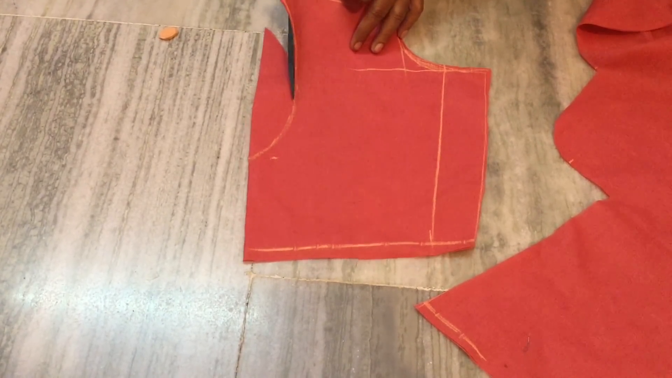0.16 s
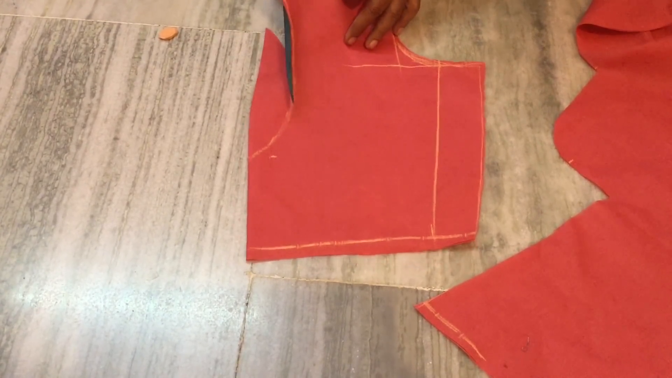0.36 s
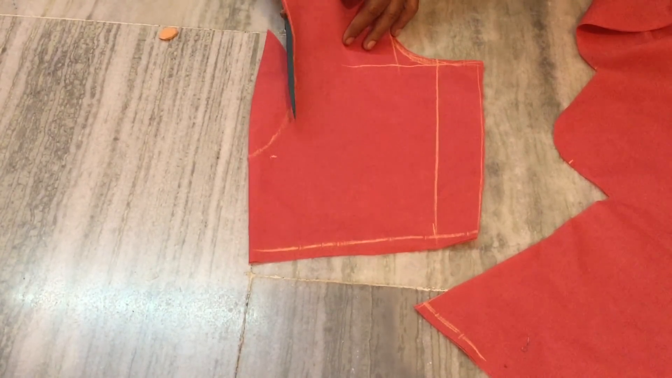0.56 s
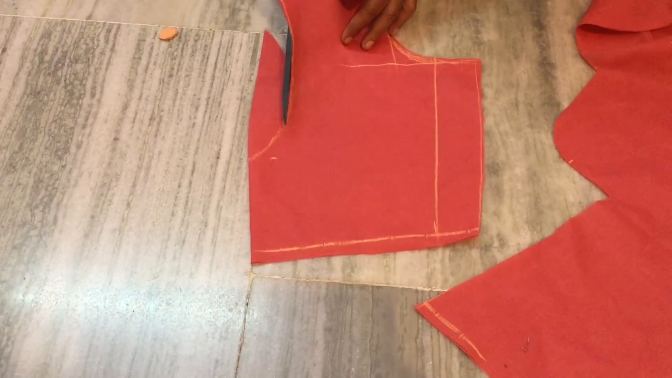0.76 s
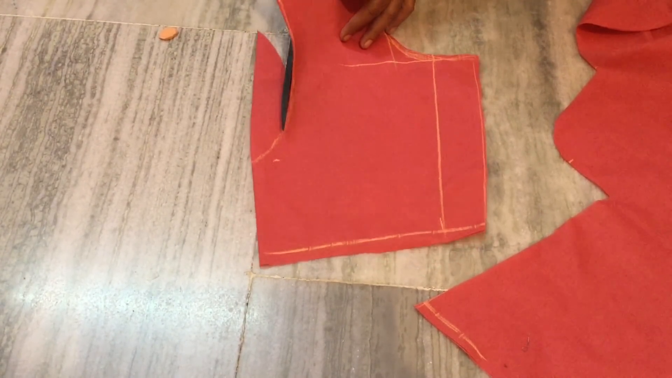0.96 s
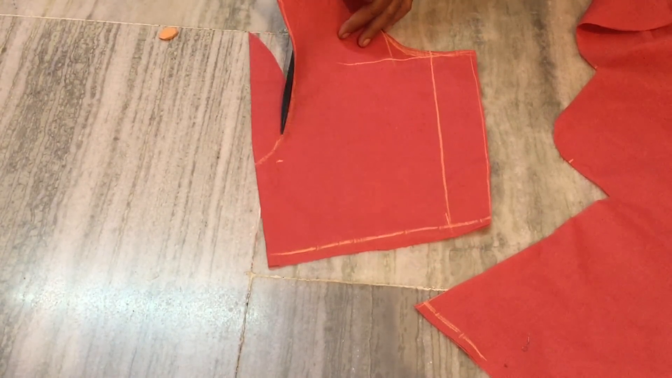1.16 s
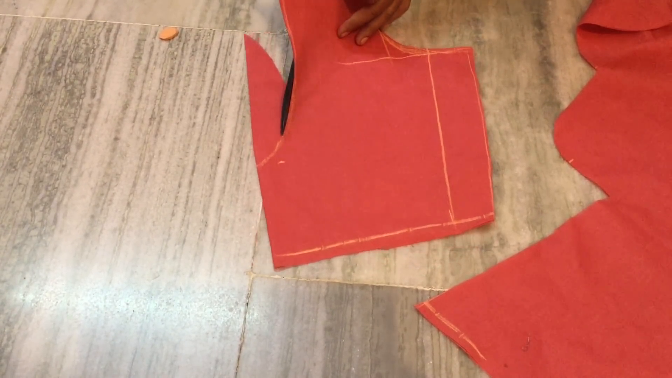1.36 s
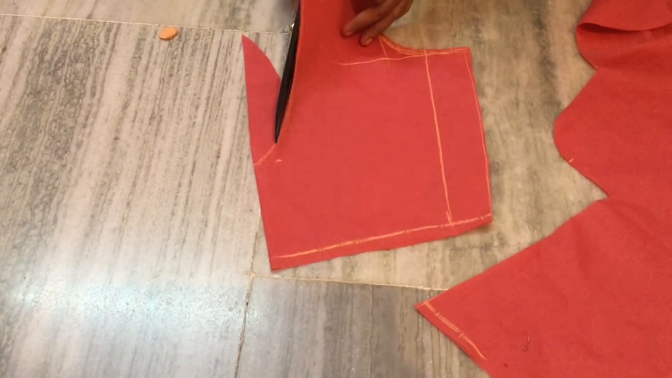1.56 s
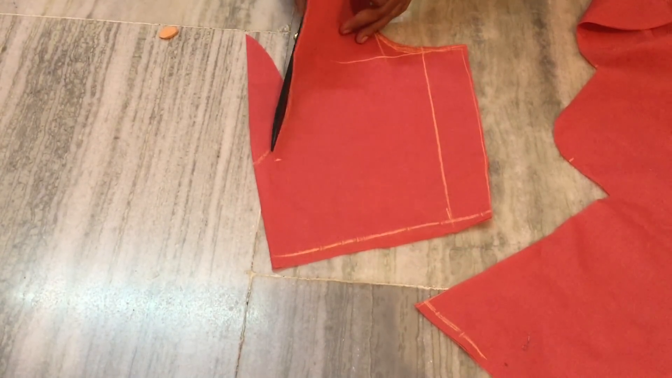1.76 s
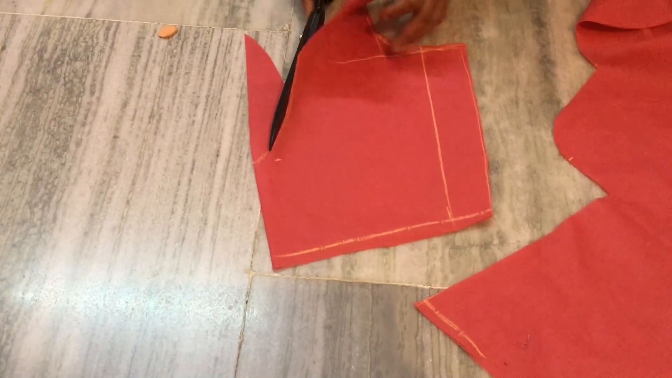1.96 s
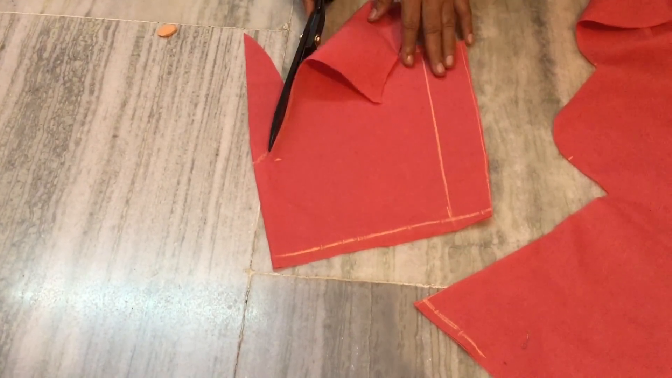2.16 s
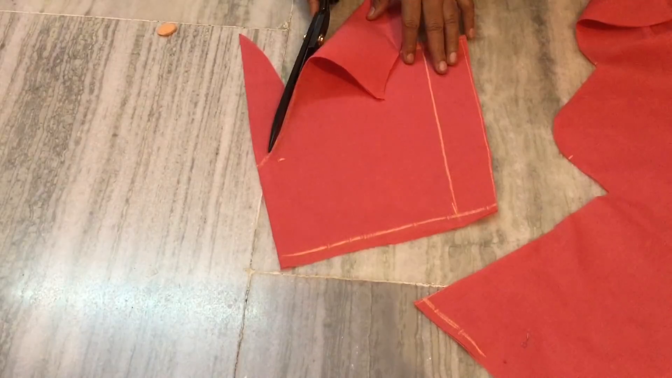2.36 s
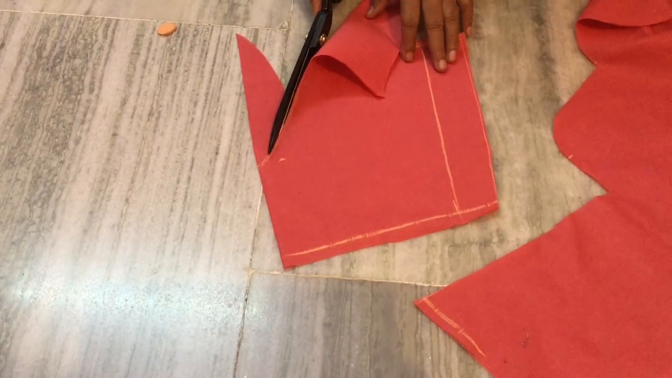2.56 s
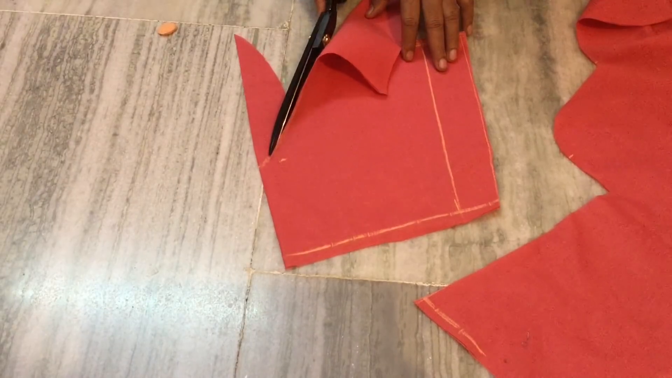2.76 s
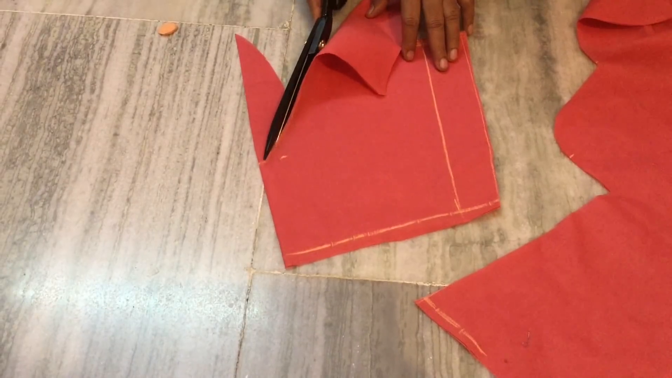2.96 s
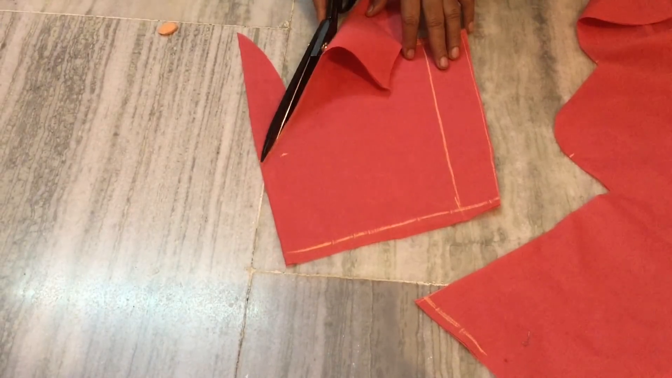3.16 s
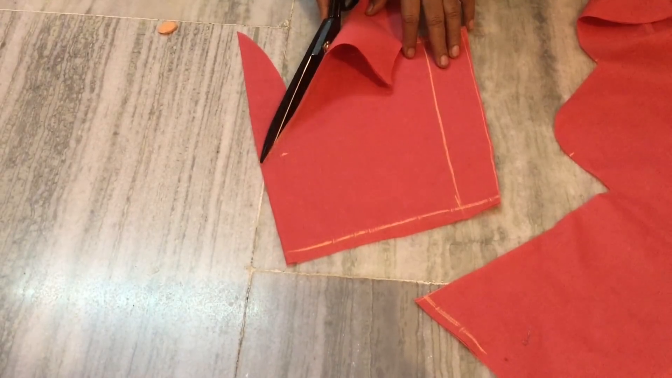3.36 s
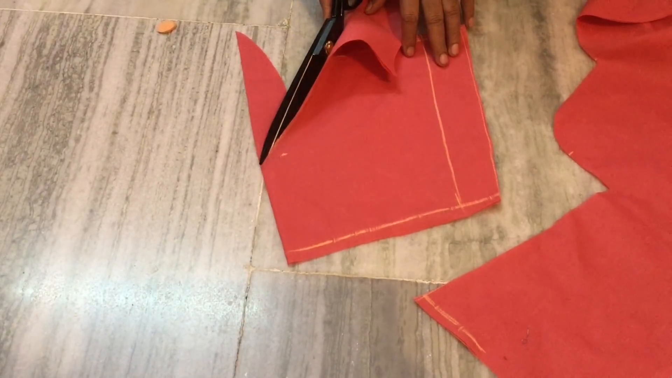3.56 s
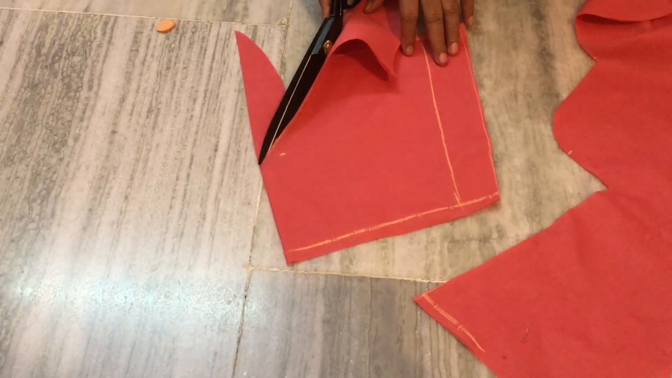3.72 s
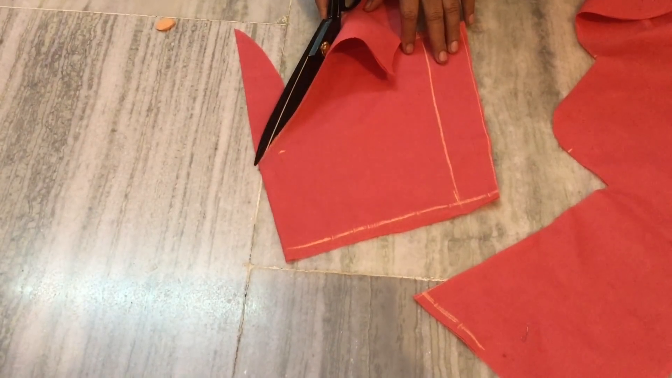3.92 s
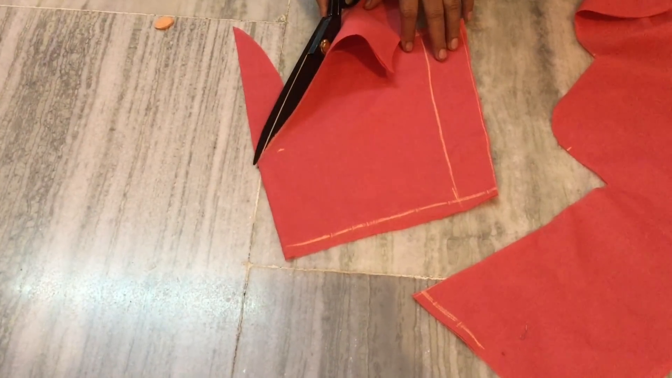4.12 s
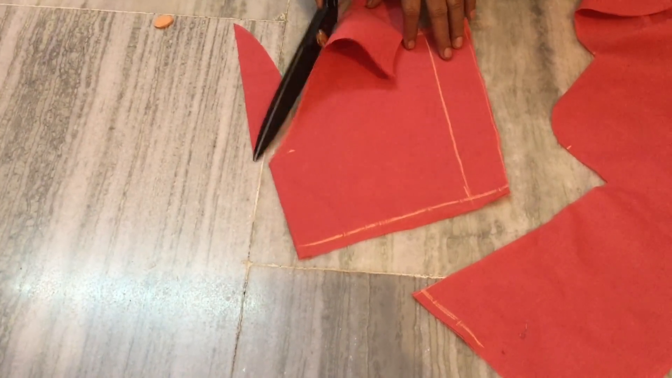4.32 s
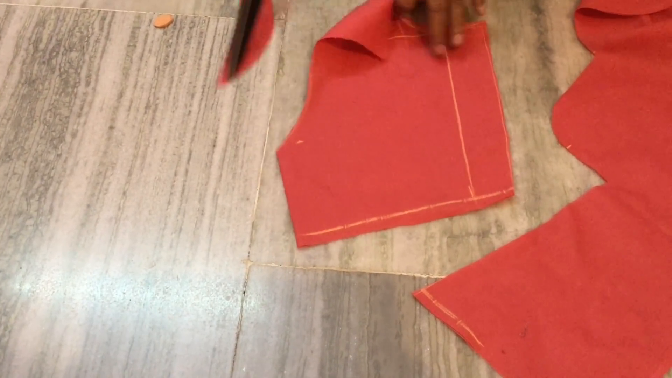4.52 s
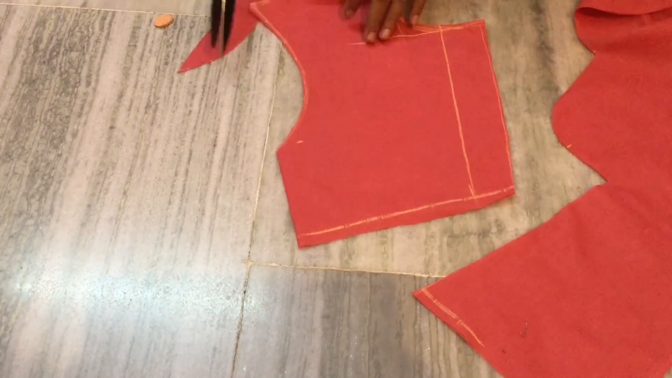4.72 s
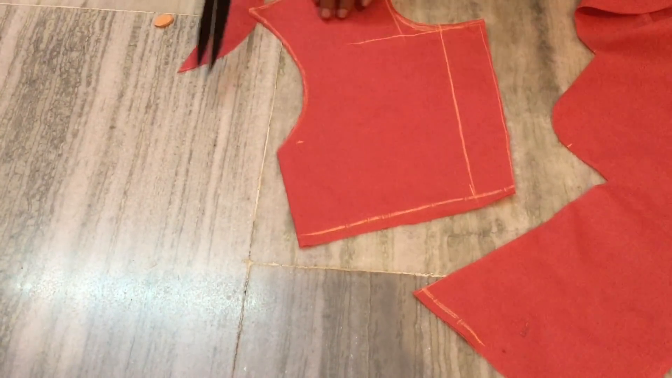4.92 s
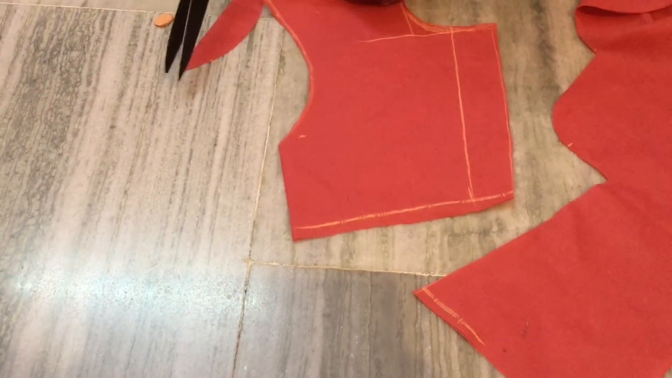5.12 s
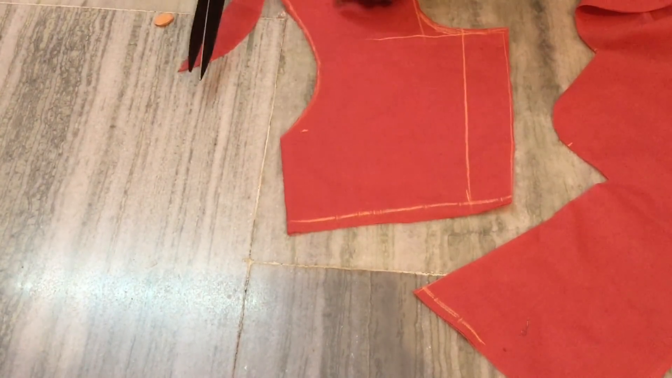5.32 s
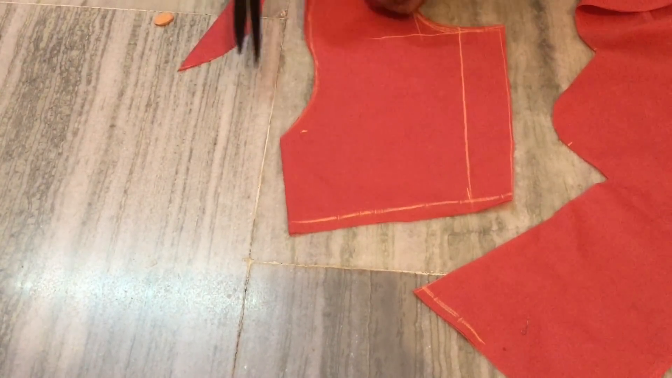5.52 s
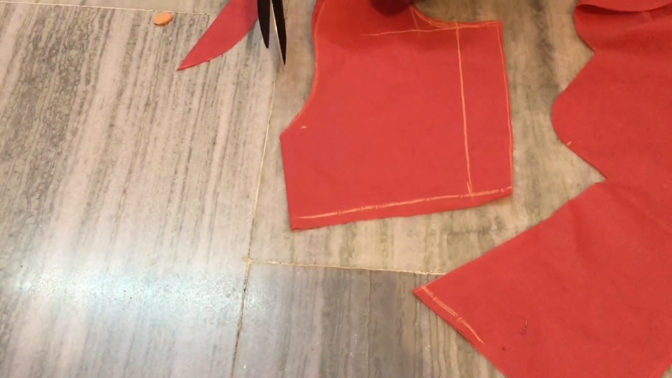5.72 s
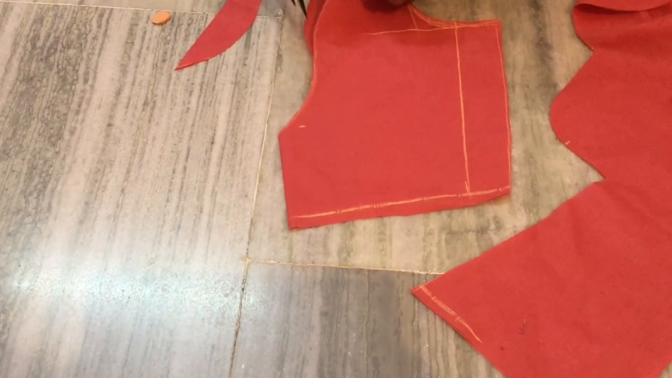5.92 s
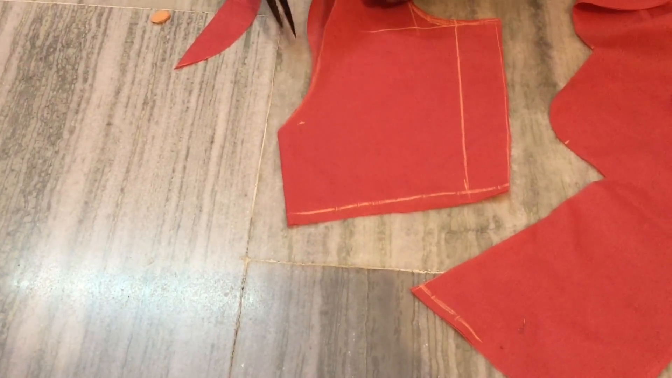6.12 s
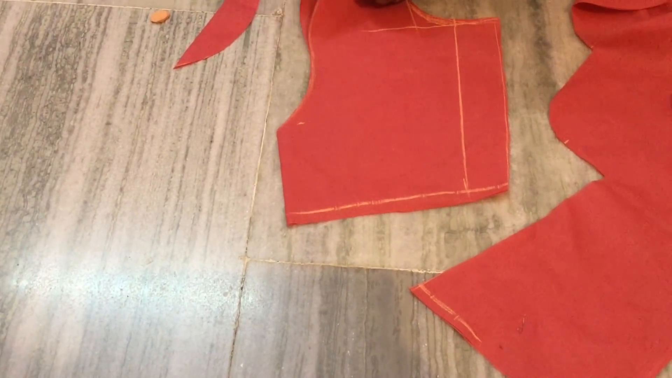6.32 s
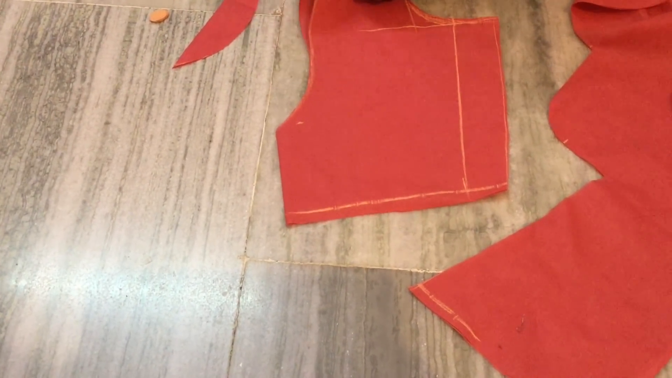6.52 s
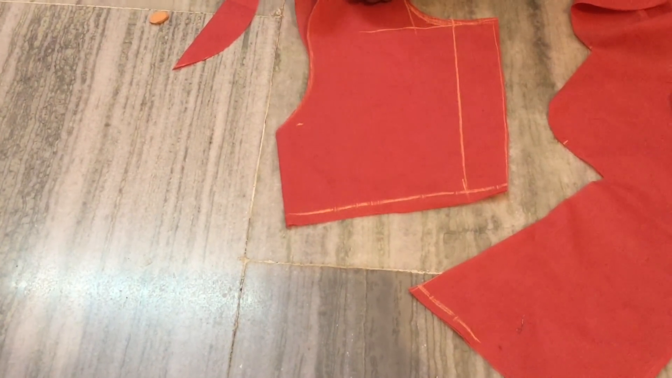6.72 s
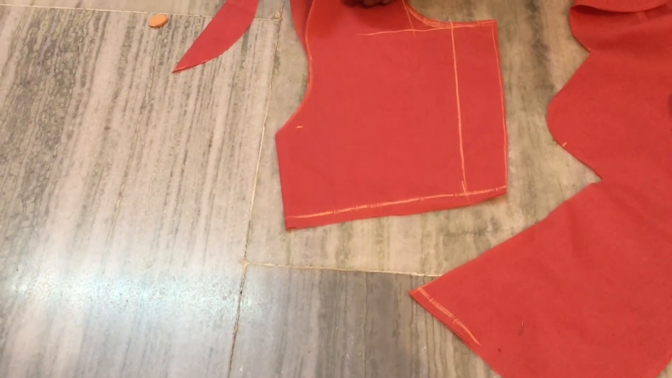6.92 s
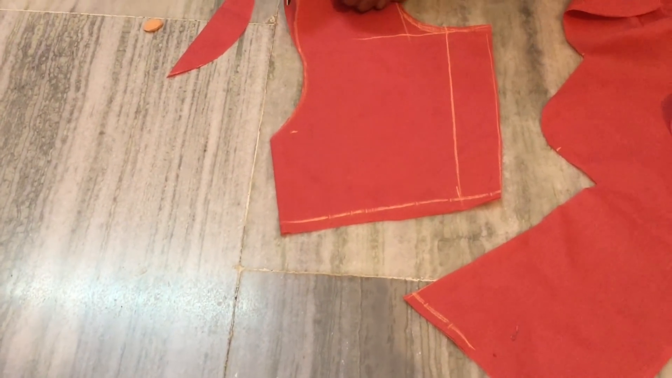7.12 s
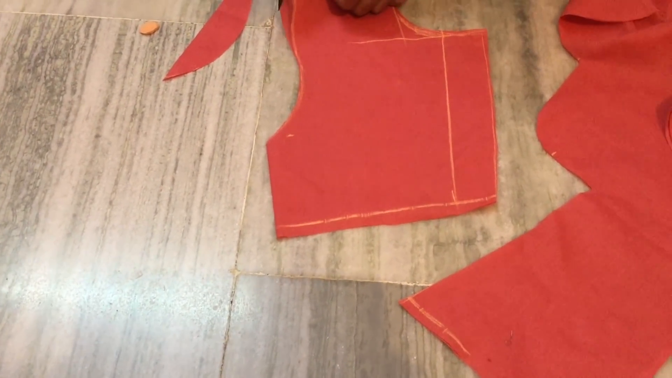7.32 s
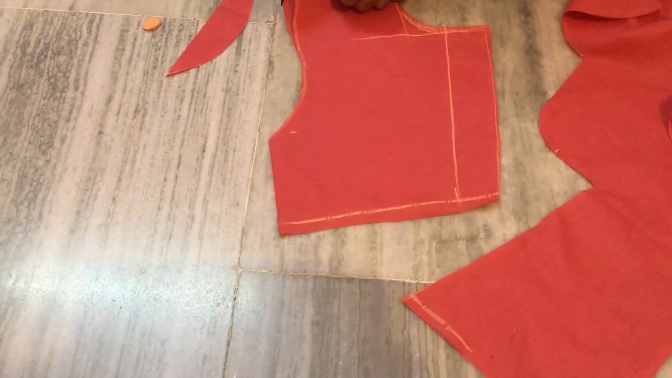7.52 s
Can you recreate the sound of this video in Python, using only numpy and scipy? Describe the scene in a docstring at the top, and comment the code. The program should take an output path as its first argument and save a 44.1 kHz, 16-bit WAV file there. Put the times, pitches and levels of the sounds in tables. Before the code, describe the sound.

A quiet hard-floored room with a short reverberant tail: soft lumpy low rumble, faint distant machine hum and steady microphone hiss. From the start, large steel shears nip cloth close by, crisp and bright, with a gritty cut and thin pivot squeaks around 0.4 and 0.8 s. A rapid run of small snips fills 0.8-1.5 s; after a lull, more nips and short slices come at 2.2-3.0 s. A strong snip at 3.35 s, a slice at 3.57 s and a dull floor tap at 3.7 s follow. The fullest, rasping cuts come at 4.2-4.8 s, ending with tiny bangle clinks. Faint bird whistles, scattered earlier, become frequent from 4.7 s to 7.1 s, with hoarse chirps near 6.1 and 7.3 s. Very faint snips linger around 5.3-5.6 s. Bangles tinkle at 6.0 s and again at 6.5-6.8 s, the last clink brightest, with a light tap. Then quiet.

```python
"""First a low lumpy rumble, a far hum and the microphone's hiss, in a quiet room with a window open.
At once large steel shears cut cloth on the stone floor: short nips and long cuts drive ringing
blade modes with the grit of parting threads, and the pivot squeaks in gliding tones.
Birds call outside, as gliding tones and throbbing noise; bangles clink, mostly at the end, as rattles
through narrow resonances, and a few taps on the floor are decaying sines. The room adds a short tail."""
import sys
import numpy as np
from scipy import signal
from scipy.fft import rfft, irfft
from scipy.io import wavfile
from scipy.ndimage import uniform_filter1d

SR = 44100
rng = np.random.default_rng(int(sys.argv[2]) if len(sys.argv) > 2 else 0)


def to_wav(s):
    """Save 16-bit WAV."""
    ch = np.atleast_2d(s).T  # columns
    pcm = np.round(np.clip(ch, -1, 1) * 32767)  # PCM
    wavfile.write(sys.argv[1], SR, pcm.astype(np.int16))


N = 334278
T = np.arange(N) / SR
SILENT_DB = -140


def amp(db):
    """Decibels to amplitude."""
    return 10 ** (np.asarray(db) / 20)


def rms_one(x):
    """Scale to an rms of 1."""
    return x / np.sqrt(np.mean(x ** 2) + 1e-20)


def played(tables, column, rest):
    """One column of many tables on the time axis, at rest between them."""
    out = np.full(N, float(rest))
    for rows in map(np.array, tables):
        inside = (T >= rows[0, 0]) & (T <= rows[-1, 0])
        out[inside] = np.interp(T[inside], rows[:, 0], rows[:, column])
    return out


def over_time(rows):
    """A two-column table of seconds and values, interpolated on the time axis."""
    return np.interp(T, *np.transpose(rows))


def resonate(x, hz, width):
    """Two-pole resonance with gain 1 on top; width in Hz."""
    r = np.exp(-np.pi * width / SR)
    feedback = [1, -2 * r * np.cos(2 * np.pi * hz / SR), r * r]
    return signal.lfilter([(1 - r * r) / 2, 0, (r * r - 1) / 2], feedback, x + 1e-18)


def drift(rate):
    """Random wander through normal values of spread 1, rate of them per second."""
    knots = rng.standard_normal(int(N / SR * rate) + 2)
    return np.interp(T * rate, np.arange(len(knots)), knots)


def coloured(spectrum):
    """Noise shaped by a spectrum; rms 1."""
    hz, db = np.transpose(spectrum)
    bins = np.maximum(np.fft.rfftfreq(N, 1 / SR), 1)
    gain = amp(np.interp(np.log(bins), np.log(hz), db))
    return rms_one(irfft(rfft(rng.standard_normal(N)) * gain, N))


# The rumble's level. Each row: time in seconds, level in dB before its wander.
RUMBLE_LEVEL = [(0.0, -57.5), (0.78, -55.5), (3.6, -60.5), (4.9, -58), (5.02, -53), (5.24, -56.5),
                (7.58, -56)]
# Spectra of the rumble and of the microphone's hiss. Each row: frequency in Hz, relative density in dB per Hz.
RUMBLE_SPECTRUM = [(18, -54), (30, -52), (60, -6.5), (102, 0.5), (130, -1.5), (222, -2), (257, -4.5),
                   (293, -4), (700, -18.5), (910, -32), (1540, -120)]
HISS_SPECTRUM = [(240, -23.5), (400, -2.5), (545, -2.5), (742, -8.5), (949, -7), (1350, -12), (1580, -12.5),
                 (2550, -17.5), (6440, -16), (11200, -22), (12900, -19), (15400, -22.5), (16000, -32.5)]
# Tones of the far machine. Each row: frequency in Hz, width in Hz, level in dB before the swell.
MACHINE_TONES = [(103.1, 3.8, -64), (219.7, 5.4, -69), (293.3, 7.4, -69.5), (805, 4.4, -78), (956, 5, -89),
                 (676, 170, -79.5), (2130, 890, -71.5)]
# The machine's swell. Each row: time in seconds, gain in dB.
MACHINE_SWELL = [(0, -6), (2.2, -13), (2.5, 0), (3.2, -0.5), (3.7, 1), (4.7, -1.5), (5.0, -13), (7.58, -25)]
HISS_DB = -63.5  # rms without the patches
PATCH_HZ = 900 * np.sqrt(2) ** np.arange(9)


def background():
    """Lumpy rumble, a far machine that swells, and hiss with faint patches: all filtered noise."""
    rumble = amp(over_time(RUMBLE_LEVEL) + 1.9 * drift(20)) * coloured(RUMBLE_SPECTRUM)
    machine = np.zeros(N)
    for hz, width, db in MACHINE_TONES:
        machine += amp(db) * rms_one(resonate(rng.standard_normal(N), hz, width))
    machine *= amp(over_time(MACHINE_SWELL))
    hiss = coloured(HISS_SPECTRUM)
    patches = sum(amp(7.5 * drift(4.1) - 17) * resonate(hiss, hz, hz / 6) for hz in PATCH_HZ)
    return rumble + machine + amp(HISS_DB) * (hiss + patches)


def threads(per_s, spread_db, clump_db):
    """Threads part at random moments, in clumps, with uneven strength; rms 1."""
    sizes = amp(spread_db * np.minimum(rng.exponential(1, N), 5)) * rng.choice([-1, 1], N)
    parting = rng.random(N) < per_s / SR
    return rms_one(sizes * parting * amp(clump_db * drift(90)))


# Centres in Hz of the four bands that carry the force on the steel.
BAND_CENTRES_HZ = [4000, 6300, 9400, 13300]
BAND_STEPS = np.arange(4) - 1.5  # for tilting the bands by a brightness


def nearest_band(hz):
    """The band whose centre is closest in pitch."""
    return np.argmin(np.abs(np.log(hz / np.array(BAND_CENTRES_HZ))))


def steel(grind, modes, bare_db, widen):
    """Force in each of four bands drives the blade modes in that band plus an unrung rasp."""
    grit, out = threads(9000, spread_db=2.5, clump_db=2.5), np.zeros(N)
    edges = [2600, 5000, 8000, 11000, 17000]  # of the rasp, Hz
    for band, force in enumerate(grind):
        own = [mode for mode in modes if nearest_band(mode[0]) == band]
        power = sum(amp(db) ** 2 * width for hz, width, db in own) * widen * np.pi / SR
        drive = force * grit
        for k, (hz, width, db) in enumerate(own):
            # the contact slides along the edge, so each mode swells and fades on its own
            swell = amp(db + 4.13 * drift(22)) / np.sqrt(power)
            out += (-1) ** k * resonate(drive * swell, hz, width * widen)
        rasp_filter = signal.butter(2, edges[band:band + 2], "band", fs=SR, output="sos")
        out += amp(bare_db) * signal.sosfilt(rasp_filter, drive)
    return out


# Ring of the steel, blades wide open and nearly shut.
# Each row: frequency in Hz, width in Hz before widening, level in dB relative to its band's other modes.
OPEN_BLADE_MODES = [(2941, 74, -14.5), (3620, 74, -9.5), (4083, 41, -3.5), (4556, 55, -7.5),
                    (5920, 103, 0.5), (6350, 67, -2), (6560, 32, -3), (7120, 114, -3), (8280, 67, -1),
                    (8670, 69, -4), (9650, 160, -3), (10340, 84, -4.5), (10700, 99, -3.5),
                    (11600, 49, -5.5), (11900, 300, -5.5), (13200, 31, -9), (13300, 29, -12),
                    (13600, 62, -5), (14050, 64, -5), (15000, 47, -29)]
SHUT_BLADE_MODES = [(1670, 140, -25), (2170, 37, -29), (2770, 41, -27), (3050, 33.4, -11),
                    (3660, 67, -13.5), (3970, 97, -14.5), (4600, 115, -7), (5140, 100, -15),
                    (6330, 180, -1), (8120, 120, -1.5), (8700, 52, -1), (9200, 98, -5.5), (10160, 69, -2),
                    (10700, 99, -3), (11240, 30, -12), (11400, 110, -5.5), (11900, 92, -5),
                    (12500, 160, -2), (12700, 12, 0), (13300, 100, 1), (14000, 56, -4), (14900, 60, -10),
                    (15200, 80, -10), (15500, 55, -15)]


def shears():
    """Nips and open cuts ring the wide open blades; cuts at the tips ring them nearly shut."""
    nip_force, ringing = nips()
    open_cuts, tip_cuts = cuts()
    wide_open = steel(nip_force + open_cuts, OPEN_BLADE_MODES, bare_db=-2.0, widen=2.5)
    tips = steel(tip_cuts, SHUT_BLADE_MODES, bare_db=-3.0, widen=1.8)
    return ringing + wide_open + tips


# Short nips. Each row: time in seconds (4 ms after the force sets in), force in dB before shaping,
# brightness in dB per band step, low and high pitch that ring out in Hz.
SHORT_NIPS = [(0.0238, -41.5, 0.1, 6350, 11170), (0.0613, -43.5, 1.5, 6350, 11960),
              (0.145, -34, 1, 4083, 11400), (0.3566, -35, -2, 7120, 9780), (0.4599, -48, -3, 6200, 13600),
              (0.7968, -49, 1.5, 7150, 13300), (0.8394, -48, 1, 4860, 13700),
              (0.9194, -53.5, 0.1, 3620, 9980), (1.0006, -49, 0, 5880, 14700),
              (1.046, -46.5, -1.5, 5820, 12500), (1.0946, -44.5, -0.5, 5800, 13600),
              (1.112, -47, -1, 5800, 13600), (1.1294, -51, 1, 5800, 13600), (1.1553, -43, 2.1, 7030, 11900),
              (1.2042, -45, 0.5, 5970, 11900), (1.259, -38, 0.5, 5920, 11900),
              (1.3024, -46, 3, 5970, 13600), (1.3813, -37, 1.3, 6560, 11600),
              (1.522, -49, -3.5, 5800, 10500), (2.1984, -46.5, -2.5, 4190, 10700),
              (2.2702, -52, -1.1, 6900, 12200), (2.3744, -52, -5, 7110, 10500),
              (2.456, -47.5, 2, 5850, 12000), (2.478, -48, 3, 5850, 13900), (2.507, -40, 2.5, 5850, 11800),
              (2.554, -41.5, 1.5, 5920, 12200), (2.797, -39, 2, 6000, 9300),
              (2.9794, -52.5, -2, 7080, 9380), (3.352, -34, 1, 5730, 12170), (3.5419, -47, 4, 5840, 12000),
              (3.8087, -43.5, 7.5, 5800, 11400), (5.3323, -55, 6, 6330, 13300),
              (5.4397, -57.5, -2, 4280, 14400), (5.5697, -53, 5.5, 7200, 9800)]
# Force of a nip in the four bands, in dB before brightness and lift.
NIP_BANDS_DB = [-20, -16.5, -16, -17.5]
PITCH_LIFT_DB = 3  # a band that holds one of the two pitches is stronger
NIP_SWELL_MS, NIP_GRIND_MS = 7, 17.9


def nips():
    """Each nip swells quickly, grinds briefly and lets go; one low and one high pitch ring out.
    Returns the force in four bands and the sound of those two pitches."""
    grind, ringing = np.zeros((4, N)), np.zeros(N)
    since_ms = np.arange(SR // 5) * 1000 / SR
    rasps = rng.standard_normal((len(SHORT_NIPS), len(since_ms)))
    shape = np.clip(since_ms / NIP_SWELL_MS, 0, 1) * np.exp(-(since_ms / NIP_GRIND_MS) ** 2)
    for (s, db, bright_db, low_hz, high_hz), rasp in zip(SHORT_NIPS, rasps):
        at = round((s - .004) * SR)
        bands_db = NIP_BANDS_DB + bright_db * BAND_STEPS
        bands_db[[nearest_band(low_hz), nearest_band(high_hz)]] += PITCH_LIFT_DB  # once if shared
        force = amp(db + bands_db)[:, None] * shape
        grind[:, at:at + len(shape)] += force
        low = resonate(rasp * force[:2].max(axis=0), low_hz, 98)
        high = resonate(rasp * force[2:].max(axis=0), high_hz, 150)
        ringing[at:at + len(shape)] += amp(19) * low + amp(17) * high
    return grind, ringing


def whistles(tones, flutter_db, waver=0.00185, partials=((1, 0),), index=2):
    """Gliding tones, softly faded in and out, unsteady in level and pitch; index picks the level column."""
    gain = uniform_filter1d(amp(played(tones, index, SILENT_DB)), size=400)
    hz = np.interp(T, *np.vstack(tones)[:, :2].T) * (1 + waver * drift(150))
    phase = 2 * np.pi * np.cumsum(hz) / SR
    voice = sum(amp(db + flutter_db * drift(60)) * np.sin(k * phase) for k, db in partials)
    return np.sqrt(2) * gain * voice


# Squeaks of the pivot, one list for each. Each row: time in seconds, pitch in Hz before waver,
# level of the fundamental in dB before flutter, base level of the overtones in dB.
PIVOT_SQUEAKS = [
    [(0.355, 1600, -79, -90), (0.375, 1585, -66, -75), (0.42, 1570, -71, -79), (0.465, 1540, -59, -72),
     (0.5, 1565, -80, -72), (0.6, 1574, -84, -75), (0.64, 1570, -87, -88)],
    [(0.775, 1490, -83, -90), (0.815, 1624, -59, -68), (0.87, 1560, -82, -88.5)],
]
# Overtones of a squeak. Each row: multiple of the pitch, level in dB against the base level.
PIVOT_OVERTONES = [(3, -10), (4, 3), (8, -10), (9, -7)]


def pivot():
    """The pivot squeaks: a wavering fundamental and, wavering apart from it, a set of overtones."""
    fundamental = whistles(PIVOT_SQUEAKS, flutter_db=6.5, waver=0.016)
    overtones = whistles(PIVOT_SQUEAKS, flutter_db=7.0, waver=0.0088, partials=PIVOT_OVERTONES, index=3)
    return fundamental + overtones


# Long cuts. Each row: start in seconds, force in dB as the edges bite, end of the push in ms after
# the start, force in dB there, fade in dB per second, brightness in dB per band step,
# blades nearly shut 0 or 1.
LONG_CUTS = [(0.362, -49, 25, -54.5, 255, -3.5, 0), (2.445, -63, 99, -63, 700, -2, 0),
             (2.674, -47.5, 49, -48.5, 600, -1.1, 0), (3.565, -47, 70, -54.5, 330, 2.2, 0),
             (4.211, -40, 16, -46, 600, 1.1, 1), (4.236, -54, 19, -43, 424, -0.3, 1),
             (4.404, -65, 63, -35.5, 300, 0.6, 1), (4.545, -42, 74, -30.5, 233, -0.15, 1),
             (4.742, -49, 24, -48, 328, 0.5, 1)]
# Force of a cut in the four bands, in dB before brightness: a row for blades open, a row for nearly shut.
CUT_BANDS_DB = [
    [-17.5, -5.5, -5.5, -4.5],
    [-14.5, -10.5, -5, -5],
]
BITE_MS = 10


def cuts():
    """The edges bite, the hand pushes on evenly, then the force fades; four bands, blades open and shut."""
    out = np.zeros((2, 4, N))
    for s, bite_db, push_ms, end_db, fade_db_per_s, bright_db, shut in LONG_CUTS:
        shut = round(shut)
        since_ms = (T - s) * 1000
        force = np.interp(since_ms, [0, BITE_MS, push_ms], [0, amp(bite_db), amp(end_db)])
        force *= amp(-fade_db_per_s * np.clip(since_ms - push_ms, 0, 1000) / 1000)
        out[shut] += amp(CUT_BANDS_DB[shut] + bright_db * BAND_STEPS)[:, None] * force
    return out


NOTE_EDGE_DB = -13.5  # level at the start and end of a note, against its loudest moment


def notes(rows):
    """Each note swells while curving into its pitch, then fades while curving away: rows of (s, Hz, dB)."""
    way = np.linspace(0, 1, 5)
    out = []
    for s, rise_ms, fall_ms, hz, into_hz, after_hz, db in rows:
        rise = [(s - rise_ms / 1000 * k, hz - into_hz * k * k, db + NOTE_EDGE_DB * k) for k in way[::-1]]
        fall = [(s + fall_ms / 1000 * k, hz + after_hz * k * k, db + NOTE_EDGE_DB * k) for k in way[1:]]
        out.append(rise + fall)
    return out


# Faint breathy tones from far off. Each row: loudest moment in seconds, rise in ms, fall in ms,
# pitch in Hz before waver, slide up into it in Hz, slide after it in Hz, level in dB before flutter.
FAINT_TONES = [(1.05, 120, 129.9, 2135, 280, -38, -69), (1.19, 9.1, 70.5, 1787, 5, -19.5, -77),
               (5.018, 25, 90, 1926, -30, -5, -71.5), (5.885, 21, 70, 1906, -41, 4, -66),
               (6.05, 60, 80, 2050, 100, 158, -71)]


def far_tones():
    """Low gliding tones made breathy by a strong random waver in pitch."""
    return whistles(notes(FAINT_TONES), flutter_db=5.5, waver=0.016)


# Bird whistles outside. Each row: loudest moment in seconds, rise in ms, fall in ms,
# pitch in Hz before waver, slide up into it in Hz, slide after it in Hz, level in dB before flutter.
BIRD_NOTES = [(2.358, 68, 22, 6740, 190, 121, -66), (3.176, 46, 70, 8320, 840, -700, -62.5),
              (4.188, 48, 24, 6453, 100, 19.5, -69), (4.74, 45, 60, 6733, 701, 60.5, -58),
              (5.025, 45, 80, 5630, 298.5, -600, -62), (5.17, 20, 20.7, 7000, -400, -200, -72),
              (5.25, 45, 45, 4000, 150, 154, -73), (5.452, 22, 95, 4353, 199.5, 78, -69),
              (5.598, 12, 14, 6600, -100, -30, -65), (5.625, 12, 15, 4760, -20, 5, -67),
              (5.652, 12, 25, 5980, -50, -78, -72), (5.708, 26, 67, 4373, 194, -52, -61),
              (5.878, 18, 22, 6676, 32, -100, -68), (5.985, 35, 33.2, 4380, 250, -38, -60.5),
              (6.084, 14, 16, 4354, 11, 40.5, -69), (6.262, 30, 60, 4345, 200, 30, -71),
              (6.464, 34, 67, 6390, 100, -39, -69), (6.732, 22, 60, 6550, 203, -130, -62.5),
              (7.05, 20, 66, 6480, 79.5, -60, -60.5)]


def birds():
    """Birds whistle single gliding tones with a slight waver."""
    return whistles(notes(BIRD_NOTES), flutter_db=6.5, waver=0.00396)


# Bangle clinks. Each row: start in seconds, rms level of the first moments in dB,
# lift of the modes below 9000 Hz in dB (10 dB is added to it), pitch struck in Hz.
BANGLE_CLINKS = [(3.3164, -58, -3, 12300), (4.7174, -45, -23, 12530), (4.747, -41, -21, 11850),
                 (5.9928, -54, -7, 11600), (6.035, -51.5, -5.5, 12750), (6.0825, -52, -22, 12500),
                 (6.4971, -62, -13.5, 12700), (6.5161, -58, -26, 13200), (6.536, -50, -27, 11900),
                 (6.5725, -55, -24, 14800), (6.603, -55, -21, 11600), (6.6266, -47, -12.5, 12300),
                 (6.6806, -51, -27, 12570), (6.7316, -44, -12, 13200), (6.777, -32, -13, 11900)]
# Modes of the bangles. Each row: frequency in Hz, width in Hz, relative strength in dB.
BANGLE_MODES = [(5940, 43, -17), (6480, 88, -11), (6980, 50, -14.5), (7830, 47, -22), (8590, 55, -31),
                (9100, 65, -28.5), (9700, 240, -20), (10300, 46, -35), (11590, 130, -6.5), (12300, 53, -8),
                (12500, 91, -0.5), (13200, 70, -8), (13600, 37, -11), (14000, 46, -20), (14800, 93, -10),
                (16000, 130, -23)]
RATTLE_MS, CLINK_SPREAD_DB, FIRST_MS = 5.5, 3, 7.7
CRACK_MS, CRACK_DB = 1.2, -16  # the bare tick at first touch


def bangles():
    """Each clink is a short rattle that wakes low modes and those near its own pitch, with uneven strength."""
    out, since_ms = np.zeros(N), np.arange(SR // 4) * 1000 / SR
    rattles = rng.standard_normal((len(BANGLE_CLINKS), len(since_ms)))
    uneven_db = CLINK_SPREAD_DB * rng.standard_normal((len(BANGLE_CLINKS), len(BANGLE_MODES)))
    for (s, db, low_db, centre_hz), rattle, uneven in zip(BANGLE_CLINKS, rattles, uneven_db):
        force = rattle * np.exp(-since_ms / RATTLE_MS)
        ringing = amp(-16.5) * resonate(resonate(force, centre_hz, 2100), centre_hz, 2100)
        ringing += amp(4.5) * resonate(resonate(force, centre_hz, 1500), centre_hz, 150)
        ringing += amp(CRACK_DB) * resonate(rattle * np.exp(-since_ms / CRACK_MS), 11600, 9000)
        for (hz, width, mode_db), chance_db in zip(BANGLE_MODES, uneven):
            reach_db = low_db + 10 if hz < 9000 else -4.5 * abs(hz - centre_hz) / 1000
            gain = amp(mode_db + reach_db + chance_db + 11.5)
            ringing += gain * resonate(resonate(force, hz, 1400), hz, width)
        out[round(s * SR):][:len(ringing)] += amp(db) * ringing / np.std(ringing[since_ms < FIRST_MS])
    return out


# Taps on the floor. Each row: start in seconds, level in dB before the decay, pitch in Hz, width in Hz.
FLOOR_TAPS = [(3.695, -33.5, 2330, 1800), (3.698, -47, 1630, 150), (3.698, -45.5, 2630, 200),
              (6.78, -47.5, 2220, 120)]


def knocks():
    """A tap is a sine dying away, faster the wider its resonance."""
    out, since = np.zeros(N), np.arange(SR // 20) / SR
    for s, db, hz, width in FLOOR_TAPS:
        tap = np.sin(2 * np.pi * hz * since) * np.exp(-np.pi * width * since)
        out[round(s * SR):][:len(since)] += amp(db) * tap
    return out


# Hoarse chirps. Each row: loudest moment in seconds, rise in ms, fall in ms, level in dB before throbbing.
HOARSE_CHIRPS = [(6.135, 45, 110, -61), (7.285, 55, 67, -60.5)]
# Bands of the hoarse voice. Each row: frequency in Hz, width in Hz of each of two passes, relative gain in dB.
HOARSE_BANDS = [(5640, 440, 1.5), (6600, 310, -0.5)]


def chirps():
    """Noise in two broad bands, throbbing at random."""
    noise = rng.standard_normal(N)
    voice = sum(amp(db) * resonate(resonate(noise, hz, width), hz, width) for hz, width, db in HOARSE_BANDS)
    rows = [(s, rise, fall, 0, 0, 0, db) for s, rise, fall, db in HOARSE_CHIRPS]
    level = played(notes(rows), 2, SILENT_DB)
    return uniform_filter1d(amp(level), size=600) * amp(2.6 * drift(40)) * rms_one(voice)


ROOM_T60_S, ROOM_DB = 0.21, -5.5


def room(x):
    """Dense decaying reflections after a short gap."""
    since = np.arange(SR // 2) / SR
    tail = rng.standard_normal(len(since)) * amp(-60 * since / ROOM_T60_S) * (since > .004)
    tail /= np.sqrt(np.sum(tail ** 2))
    return x + amp(ROOM_DB) * signal.fftconvolve(x, tail)[:N]


def scene():
    """All but the background passes through the room; one channel."""
    indoors = shears() + pivot() + bangles() + knocks()
    outside = far_tones() + birds() + chirps()
    return (background() + room(indoors + outside))[None]


CUTOFF_HZ = 15850


def record(dry):
    """A steep low-pass cuts the top."""
    return signal.sosfilt(signal.ellip(12, .5, 60, CUTOFF_HZ, fs=SR, output="sos"), dry)


dry = scene()
out = record(dry)
to_wav(out)
```